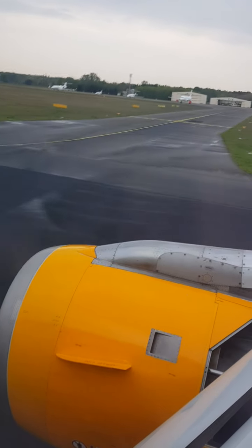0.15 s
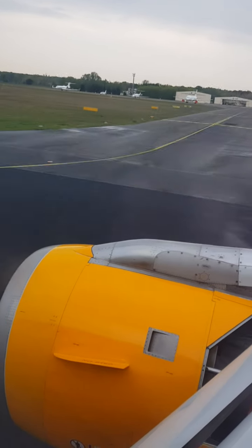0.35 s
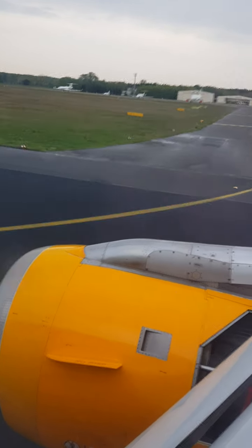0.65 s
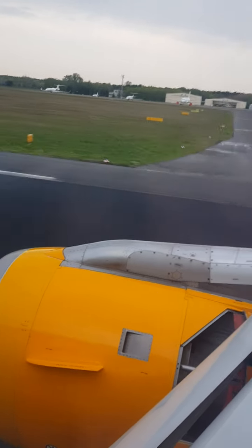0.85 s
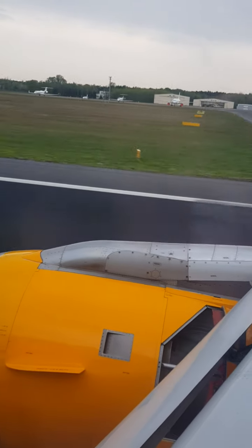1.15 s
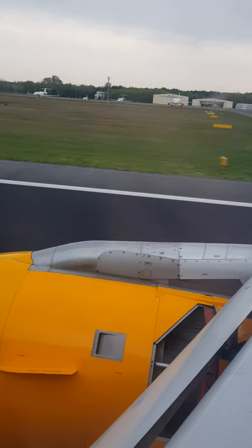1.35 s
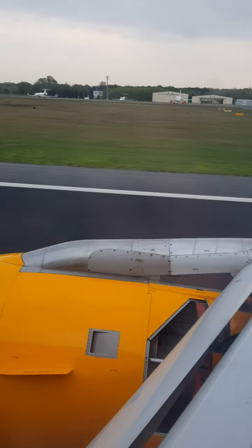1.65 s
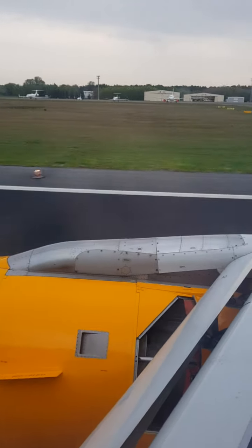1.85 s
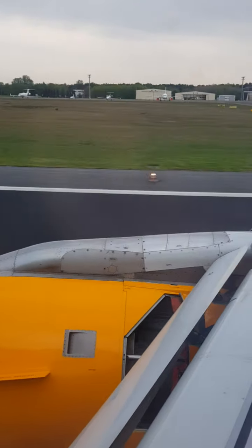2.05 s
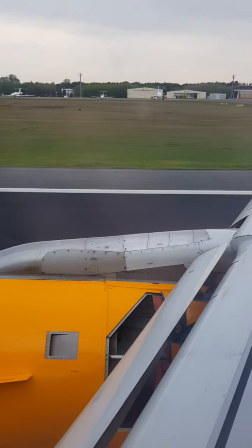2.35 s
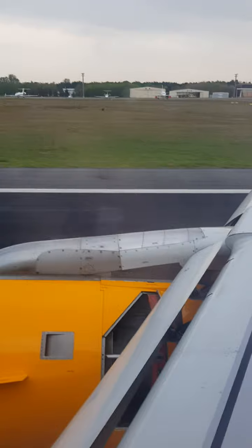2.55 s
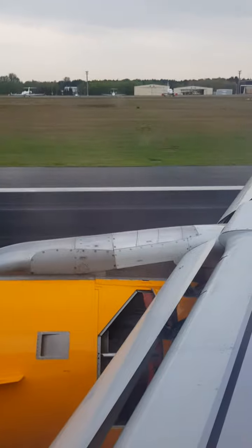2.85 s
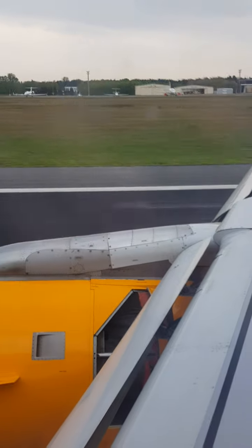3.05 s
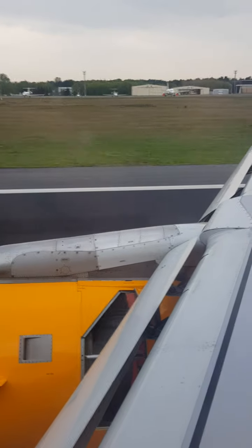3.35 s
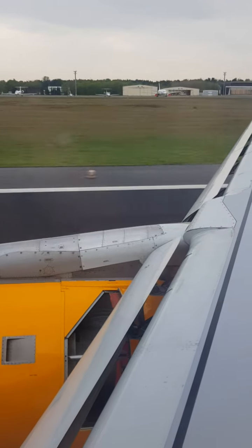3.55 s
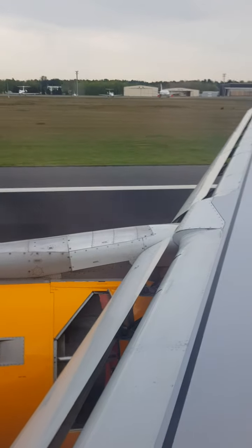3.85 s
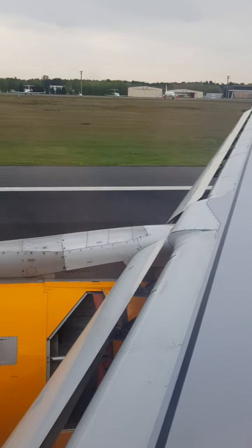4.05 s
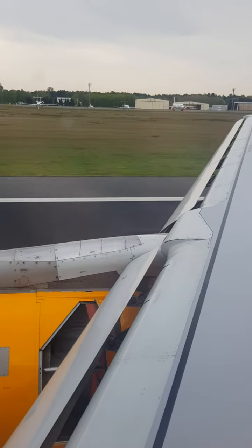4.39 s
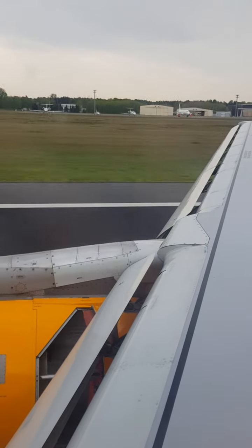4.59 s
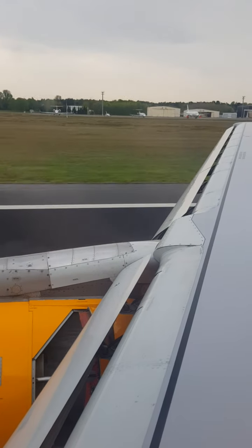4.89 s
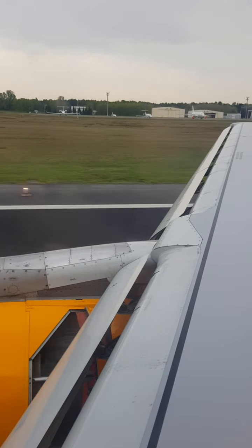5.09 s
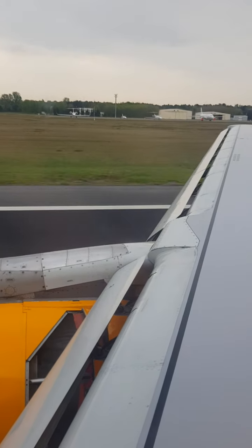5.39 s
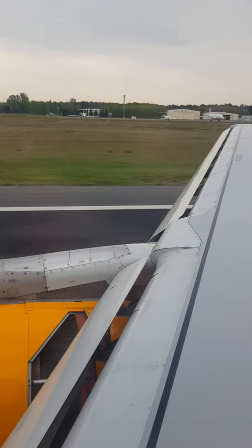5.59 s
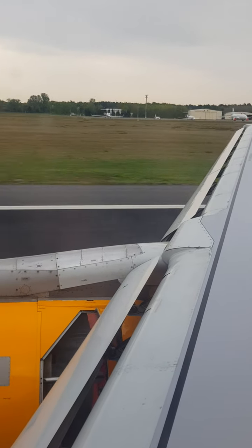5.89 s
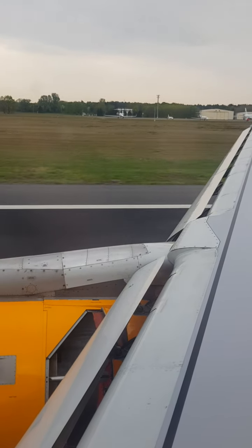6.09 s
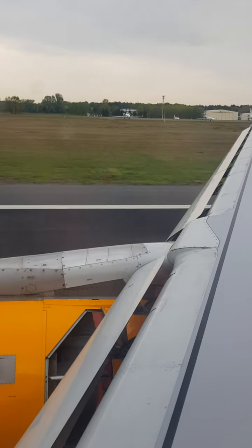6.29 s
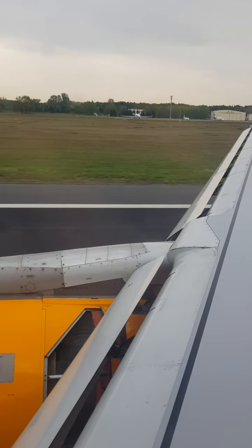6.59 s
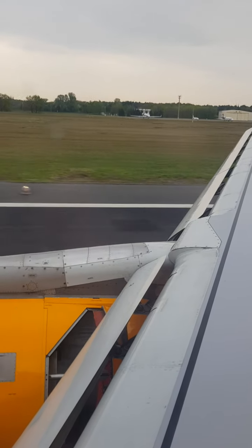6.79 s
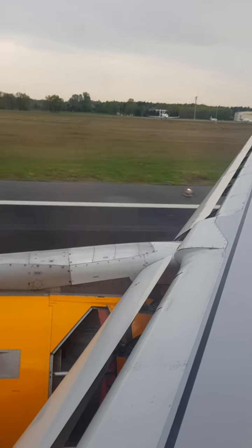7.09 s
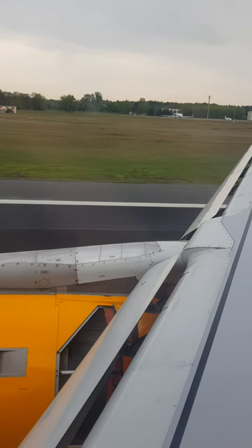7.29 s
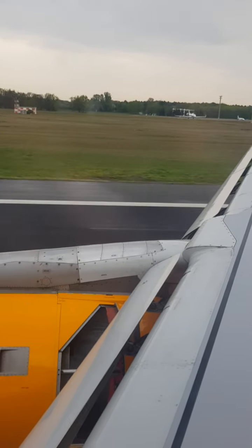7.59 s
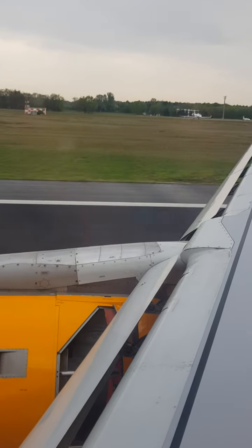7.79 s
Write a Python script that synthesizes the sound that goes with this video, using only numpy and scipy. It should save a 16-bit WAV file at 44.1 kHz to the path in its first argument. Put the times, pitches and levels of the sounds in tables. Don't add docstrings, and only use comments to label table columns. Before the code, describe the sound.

Loud, steady jet roar fills an airliner cabin during landing rollout, with a low beating hum, squeaking trim, small rattly buzzes and handling pops.

```python
import sys
import numpy as np
from scipy import signal
from scipy.fft import rfft, irfft, next_fast_len
from scipy.io import wavfile
from scipy.ndimage import uniform_filter1d, minimum_filter1d, map_coordinates

SR = 44100
rng = np.random.default_rng(int(sys.argv[2]) if len(sys.argv) > 2 else 0)


def ratio(d):
    e = np.asarray(d, float) / 20
    return 10 ** e


def generate_wav(sig):
    pcm = np.round(np.clip(np.atleast_2d(sig).T, -1, 1) * 32767).astype(np.int16)
    wavfile.write(sys.argv[1], SR, pcm)


N = 350154

# time in seconds, level in dB.
ROAR_LEVEL = [(0, -27.5), (.55, -27), (.8, -30.5), (1.17, -36), (1.72, -37.5), (2.0, -31.5), (2.25, -29.5),
              (3.4, -27.5), (4.2, -29), (4.8, -29), (5.3, -29), (6.9, -27.5), (7.6, -28), (7.94, -29.5)]


def unit(x):
    return x / np.sqrt(np.mean(x ** 2) + 1e-20)


def along(points, hz):
    f, v = np.transpose(points)
    return np.interp(np.log(hz + 1), np.log(f + 1), v)


def curves(rows):
    s, *cols = np.transpose(rows)
    return [np.interp(np.arange(N) / SR, s, c) for c in cols]


def wobble(rate):
    knots = rng.standard_normal(int(N * rate / SR) + 4)
    return map_coordinates(knots, [np.arange(N) * rate / SR])


def lifts(rows):
    t = np.arange(0, N / SR + .002, .001)
    lift_db = sum(db * np.exp(-((t - s) / half) ** 4) for s, db, half in rows)
    return np.interp(np.arange(N) / SR, t, lift_db)


def filtered(x, response):
    m = next_fast_len(N + SR // 2)
    return irfft(rfft(x, m) * response(np.fft.rfftfreq(m, 1 / SR)), m)[..., :N]


def modes(table):
    def response(f):
        total = 0
        for k, (centre, width, db) in enumerate(table):
            damping = 1j * f * width
            total = total + (-1) ** k * ratio(db) * damping / (centre ** 2 - f * f + damping)
        return total
    return response


def sides(pan_db):
    return ratio(np.array([[.5], [-.5]]) * pan_db)


def add(track, s, sound):
    part = track[:, round(s * SR):][:, :sound.shape[-1]]
    part += sound[..., :part.shape[-1]]


def rush(gain, patchy_db, size=(6, 10)):
    # frequency in Hz, left-right correlation.
    likeness = [(30, .995), (70, 0.98), (130, 1), (290, .93), (640, 0.37), (1410, -0.31), (3100, 0.089),
                (15000, -0.39)]
    # frequency in Hz, left over right in dB.
    side_lean = [(60, -1.5), (130, 4.5), (250, 1), (600, 4.5), (1300, 1.5), (2400, -2), (4400, 5.5),
                 (15000, -1)]
    z = signal.stft(rng.standard_normal((2, N)), nperseg=512)[2]
    field = uniform_filter1d(rng.standard_normal(z.shape[1:]), size=size[0], axis=0)
    field = uniform_filter1d(field, size=size[1], axis=1)
    pair = signal.istft(z * ratio(patchy_db * unit(field)), nperseg=512)[1][:, :N]

    def mid_side_gain(hz):
        turn = np.arccos(np.clip(along(likeness, hz), -1, 1)) / 2
        return gain(hz) * [np.cos(turn), np.sin(turn)]

    mid, side = filtered(pair, mid_side_gain)
    left_right = np.array([mid + side, mid - side])
    return unit(filtered(left_right, lambda hz: sides(along(side_lean, hz))))


def roar():
    # frequency in Hz, density in dB per Hz.
    rumble_spectrum = [(12, -60.5), (22, -18.5), (40, -5), (57, 0.5), (70, -3.5), (85, -3), (120, -2),
                       (150, -5), (185, -1.5), (215, -43.5), (260, -120)]
    body_spectrum = [(150, -120), (190, -1), (215, -3.5), (250, -8), (310, -9), (400, -12.5), (500, -17),
                     (620, -24.5), (850, -35), (1300, -120)]
    hiss_spectrum = [(350, -29), (600, -8.5), (780, -4), (1100, -8.5), (1180, -8), (1350, -11), (1890, -11),
                     (3100, -16.5), (4800, -27), (7190, -34), (8200, -50.5), (10700, -69), (18000, -120)]
    air_spectrum = [(4120, -31.5), (7000, -2.5), (8340, -6.5), (11100, -2), (15100, -10), (15600, -13.5)]
    cloth_spectrum = [(2500, -40), (4000, -2), (5200, 0), (6800, -6), (9000, -31)]
    # time in seconds, lift in dB, half length in seconds.
    rustles = [(.1, 4, .15), (.33, 2, .05), (.55, 4.5, .12), (.9, 3.5, .15), (1.22, 4.5, .03),
               (1.409, 7, 0.011), (1.909, 5, .03), (2.13, 5.5, .04), (2.302, 3, .015), (2.463, 4, .01),
               (3.086, 7, 0.1), (3.76, 5.5, .08), (3.897, 3, 0.026), (5.748, 4, 0.026), (5.93, 2.5, .04),
               (6.311, 2.5, .04), (7.15, 4.5, .15), (7.9, 2.5, .05)]
    # time in seconds, lift in dB, half length in seconds.
    jolts = [
        (0, 3, 0.092),
        (.29, 4.5, .08),
        (3.76, 3.5, 0.092),
        (7.1, -0.5, 0.17),
        (7.78, -3, 0.065),
        (7.9, 0.5, 0.036),
    ]
    level_db, = curves(ROAR_LEVEL)
    usual_db = np.median(level_db)
    swing_db = level_db - usual_db
    rustle_db, jolt_db, shake = lifts(rustles), lifts(jolts), wobble(4.4)

    def layer(spectrum, patchy_db, **shape):
        return rush(lambda hz: ratio(along(spectrum, hz)), patchy_db, **shape)

    rumble_db = usual_db + 10.5 + 1.05 * swing_db + jolt_db
    hiss_db = usual_db - 11 + 0.82 * swing_db + 0.7 * jolt_db + 0.24 * shake
    air_db = usual_db - 35.5 + .6 * swing_db + rustle_db + .6 * shake + 1.2 * wobble(40)
    cloth_db = -69 + .6 * swing_db + 2.2 * rustle_db + 2.5 * wobble(60)

    resonance = modes([(164, 9, 0)])
    boom = ratio(rumble_db - 12) * rush(lambda hz: abs(resonance(hz)) ** 2, patchy_db=1.0)
    rumble = ratio(rumble_db) * layer(rumble_spectrum, 0.17)
    body = ratio(level_db + 1.98) * layer(body_spectrum, 0.68)
    hiss = ratio(hiss_db) * layer(hiss_spectrum, 1.4)
    air = ratio(air_db) * layer(air_spectrum, 1.6, size=(30, 4))
    cloth = ratio(cloth_db) * layer(cloth_spectrum, 2.5, size=(12, 2))
    return boom + rumble + body + hiss + air + cloth


def cabin(x):
    # frequency in Hz, decay time t60 in seconds.
    decay_times = [(500, .25), (3000, 0.22), (10000, 0.04)]
    hz, t, z = signal.stft(rng.standard_normal((2, SR // 3)), SR, nperseg=256)
    decay = ratio(-60 * t / along(decay_times, hz)[:, None])
    tail = signal.istft(z * decay, SR, nperseg=256)[1]
    tail = tail / np.linalg.norm(tail[0])
    return signal.fftconvolve(x.mean(axis=0)[None], tail, axes=1)[:, :N]


def ticks():
    # start in seconds, peak in dB, left over right in dB, decay time t60 in seconds.
    contacts = [(0.4457, -44, 7, 0.02), (0.5265, -36.5, 4.5, 0.03), (.532, -42.5, 4.5, .07),
                (.648, -45.5, 3, .04), (.829, -48, -0.5, .015), (1.7257, -44, -7.5, 0.02),
                (3.2775, -41, 5.5, 0.019), (3.455, -39.5, 6, 0.018), (3.7597, -42.5, -4, 0.02),
                (3.855, -48.5, 1.5, 0.02), (4.746, -44, -1.5, 0.02), (5.681, -29.5, 1, 0.027),
                (5.6944, -41.5, -0.5, 0.05), (6.645, -45, 3, 0.02), (7.287, -47, 1.5, 0.02),
                (7.568, -44, 2, .03)]
    out, t = np.zeros((2, N)), np.arange(SR // 10) / SR
    for s, db, pan_db, t60 in contacts:
        crack = rng.standard_normal((2, len(t)))
        add(out, s, ratio(db - 60 * t / t60) * sides(pan_db) * crack)
    return filtered(out, lambda hz: 1j * hz / (3000 + 1j * hz))


def squeaks():
    # start in seconds, peak in dB, pitch in Hz, length in seconds.
    rubs = [(0.019, -44, 3800, .013), (0.205, -36.5, 3370, 0.0099), (0.217, -37, 3790, 0.015),
            (0.382, -43, 3400, .03), (0.415, -39, 3510, 0.026), (0.562, -36, 3470, 0.03),
            (.98, -30.5, 3680, 0.011), (0.994, -39, 3450, .025), (1.482, -46, 2720, 0.013),
            (3.396, -43, 2850, 0.025), (2.991, -43, 3150, .037), (3.097, -34, 2120, .02),
            (3.099, -31, 2675, 0.014), (3.367, -49, 3470, .017), (3.541, -36, 3510, 0.016),
            (3.624, -45, 3182, 0.024), (3.733, -37, 2970, 0.045), (3.997, -39.5, 3090, .026),
            (4.271, -37, 2980, .021), (4.469, -46, 2946, 0.021), (4.565, -39.5, 2980, 0.027),
            (4.66, -41, 3140, .013), (4.857, -45, 3105, .035), (5.039, -40.5, 3350, .039),
            (5.74, -37.5, 3200, .014), (6.012, -41.5, 3290, 0.015), (6.524, -43.5, 3150, .018),
            (6.846, -41.5, 3086, .025), (7.295, -33.5, 2780, .02), (7.435, -43.5, 3200, .024)]
    out, t = np.zeros((2, N)), np.arange(SR // 8) / SR
    for s, db, hz, length in rubs:
        knots = rng.standard_normal((3, 80))
        slip, *grip = [np.interp(t * 420, np.arange(len(k)), k) for k in knots]
        octave_db = -58 + .4 * (db + 40) - db
        octave_db += 4 * np.exp(-((2 * hz - 6250) / 450) ** 2)
        pan_db = 7.5 * (3300 - max(hz, 2700)) / 1000 + 1.5 * knots[1, -1]

        mean_slip = slip[:round(length * SR)].mean()
        pitch_hz = hz * (1 + .04 * (slip - mean_slip))
        port_phase = [[0], [knots[0, 0] + 2.1]]
        phase = 2 * np.pi * np.cumsum(pitch_hz) / SR + port_phase
        trim_mode = np.sin(2 * np.pi * np.cumsum(4210 + 90 * slip) / SR)
        note = np.sin(phase) + ratio(octave_db) * (np.sin(2 * phase) + 1.4 * trim_mode)

        shape = (1 - np.exp(-t / 0.002)) * np.exp(-(t / max(length, .005)) ** 2)
        shape = shape * ratio(4.8 * np.array(grip))
        energy = np.sum(shape ** 2, axis=1, keepdims=True)
        shape = shape / np.sqrt(energy / (length * SR)) * 0.93
        add(out, s, ratio(db) * sides(pan_db) * shape * note)
    return out


def buzz(rotor_hz):
    # start in seconds, peak in dB, length in seconds.
    bursts = [(0.308, -42.5, .03), (0.646, -38.5, .03), (3.535, -39.5, .03), (3.675, -40, .04),
              (3.749, -43.5, .02), (3.854, -42, .085), (4.032, -37.5, .015), (4.107, -46, .035),
              (4.19, -39.5, .02), (4.27, -39, .05), (4.384, -42, .1), (4.618, -39, 0.051),
              (4.721, -39.5, .035), (4.769, -40, .02), (4.853, -43, .045), (4.914, -49, 0.068),
              (5.04, -41, .025), (5.102, -42, .01), (5.162, -46, 0.05), (5.353, -44.5, 0.018),
              (5.897, -41, .06), (5.993, -41.5, .01), (6.301, -47, .04), (6.646, -42, .045),
              (6.81, -40, .01), (7.16, -42, .09), (7.26, -38.5, .055), (7.568, -37.5, .03),
              (7.61, -45, .05), (7.77, -43.5, .035)]
    # centre in Hz, width in Hz, level in dB.
    panel_modes = [(2300, 900, -1), (3490, 340, 0.5), (4050, 340, -1.5), (4500, 340, -3), (5000, 300, -8),
                   (5680, 160, -4), (6800, 1000, -14), (10800, 1500, -28), (14500, 2500, -26)]
    grille_modes = [(13500, 900, -2), (15400, 700, 1)]
    cycles = np.cumsum(rotor_hz * (1 + .045 * wobble(90))) / SR
    tap_db = 2.4 * rng.standard_normal(N).clip(-3, 1.5)
    taps = np.diff(cycles // 1, prepend=0) * ratio(tap_db)
    contact = np.zeros(N)
    for s, db, length in bursts:
        contact[round((s - .003) * SR):round((s + length) * SR)] += ratio(db + 22)

    scrape_level = signal.fftconvolve(taps, np.exp(-np.arange(100) / 18.))[:N]
    strike = 2.3 * taps + .6 * scrape_level * rng.standard_normal((2, N))
    panel = filtered(strike * contact, modes(panel_modes))
    grille_drive = ratio(-50 + 5 * wobble(12)) + ratio(-32) * contact
    grille = filtered(strike * grille_drive, lambda hz: modes(grille_modes)(hz) ** 2)
    return (panel + grille) * ratio([[0], [-9]])


def pops():
    # time in seconds, peak in dB, width in ms, rebound share, rebound frequency in Hz.
    finger_taps = [(.4471, -10, 0.33, .4, 800), (0.5078, -5.5, 0.16, 0.37, 800),
                   (0.525, -16.5, .05, .5, 1200), (0.5287, -13, 0.073, 0.36, 900),
                   (0.559, -21, .16, 0.29, 700), (0.5573, -23, 0.17, .5, 700),
                   (0.5695, -11, 0.12, 0.74, 800), (0.6821, 3, 0.13, 0.26, 750),
                   (2.0167, -13.5, 0.22, 0.62, 710), (3.0824, -9.5, 0.055, 0.22, 1305),
                   (3.081, -14.5, 0.041, 0.77, 1300), (3.172, -18, 0.04, 0.59, 1600),
                   (3.2787, -13, 0.053, 0.58, 3860), (3.2786, -17.5, 0.18, 0.83, 1000),
                   (3.4575, -7, 0.063, 0.56, 1200)]
    out, ms = np.zeros((2, N)), np.arange(-60, 300) / SR * 1000
    for s, db, width, share, hz in finger_taps:
        spike = 1 / (1 + (ms / width) ** 2) ** 1.7
        after = np.maximum(ms - width, 0)
        rebound = 2.07 * share * np.sin(2 * np.pi * hz * after / 1000) * np.exp(-after / 0.31)
        add(out, s + ms[0] / 1000, ratio(db) * (spike - rebound) * ratio([[0], [-24]]))
    return filtered(out, lambda f: 1 / (1 + (f / 6500) ** 8) ** .5)


def rotor_speed():
    return 168.47 + 0.44 * wobble(1.2)


def tones(hum_phase):
    # time in seconds, level in dB.
    hum_level = [(0, -12), (.3, -12.5), (.52, -9), (.8, -14.5), (1.0, -16), (1.6, -17), (2.1, -15.5),
                 (2.68, -12.5), (2.95, -14.5), (3.4, -10.5), (3.95, -10.5), (4.8, -10), (5.3, -16),
                 (6.05, -13.5), (6.3, -11.5), (7.1, -9), (7.44, -7), (7.94, -13.5)]
    # multiple of the hum, level in dB relative to it.
    overtones = [(2, -33), (3, -36.5)]
    # time in seconds, pitch in Hz, level in dB.
    pump_course = [(0, 386.6, -26), (.6, 388, -23), (1.1, 387.5, -33.5), (1.8, 387.6, -32.5),
                   (2.1, 387.7, -29.5), (2.9, 388, -28.5), (3.3, 389.3, -26), (4.0, 387.5, -23),
                   (4.7, 389.3, -22), (5.3, 388.3, -24.5), (6.1, 387, -21), (7.94, 387.3, -25)]
    hum = np.sin(hum_phase)
    for multiple, db in overtones:
        hum = hum + ratio(db) * np.sin(multiple * hum_phase)
    hum_db = curves(hum_level)[0] + 1.36 * wobble(8)

    pump_hz, pump_db = curves(pump_course)
    phase = 2 * np.pi * np.cumsum(pump_hz) / SR
    t = np.arange(N) / SR
    octave_db = curves(ROAR_LEVEL)[0] - 16 - 3 * abs(t - 4.1) ** 0.98
    octave_db += 2.5 * (wobble(3.3) + wobble(14))
    pump = ratio(pump_db + 1.1 * wobble(9)) * np.sin(phase + [[0], [.16]])
    octave = ratio(octave_db) * sides(11.0) * np.sin(2 * phase + [[0], [2.8]])

    whistle_hz = [7100 + 25 * wobble(30), 7400 + 25 * wobble(30)]
    whistle = np.sin(2 * np.pi * np.cumsum(whistle_hz, axis=1) / SR)
    whistle = ratio(-77.5 + 3 * wobble(2.8)) * (t > 1.8) * whistle
    return np.sqrt(2) * (ratio(hum_db) * hum * sides(5.37) + pump + octave + whistle)


def scene():
    rotor_hz = rotor_speed()
    hum_phase = 2 * np.pi * np.cumsum(rotor_hz) / SR
    trim = squeaks() + ticks()
    rattle = buzz(rotor_hz)
    reverberation = cabin(ratio(-6.5) * trim + ratio(-3.5) * rattle)
    return roar() + reverberation + trim + rattle + pops() + tones(hum_phase)


def limited(x, hold=0.031):
    need = np.minimum(1, 1 / (abs(x).max(axis=0) + 1e-9))
    span = int(hold * SR) + 1
    return x * uniform_filter1d(minimum_filter1d(need, size=span), size=span // 2 + 1)


def band_limit(x):
    return signal.sosfilt(signal.butter(12, 15780, fs=SR, output="sos"), x)


def record(dry):
    mix = limited(dry)
    return band_limit(mix)


dry = scene()
out = record(dry)
generate_wav(out)
```